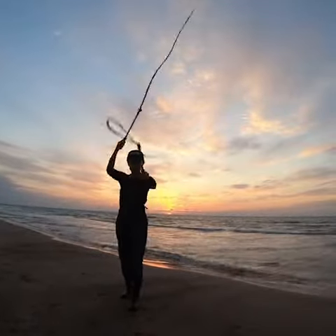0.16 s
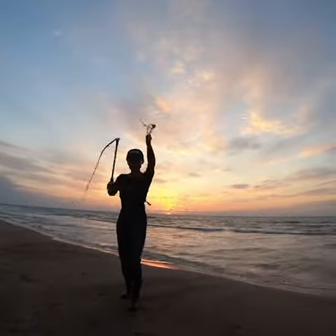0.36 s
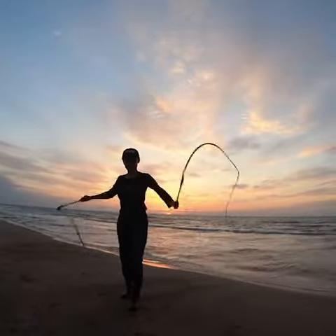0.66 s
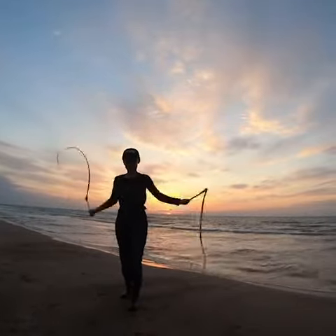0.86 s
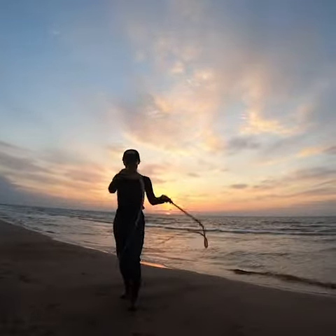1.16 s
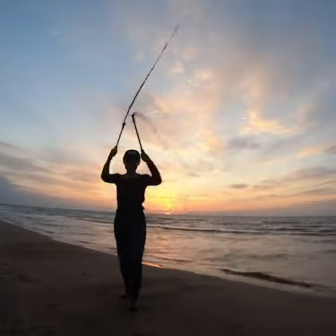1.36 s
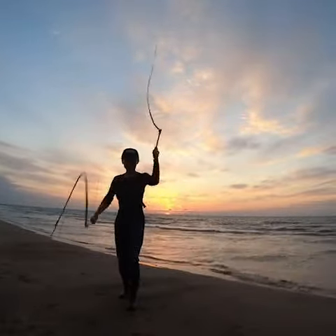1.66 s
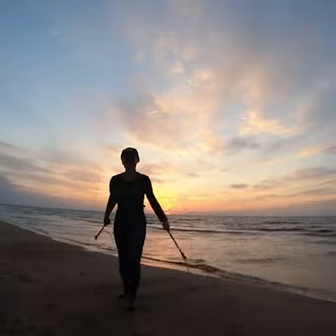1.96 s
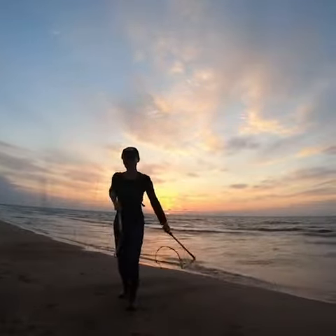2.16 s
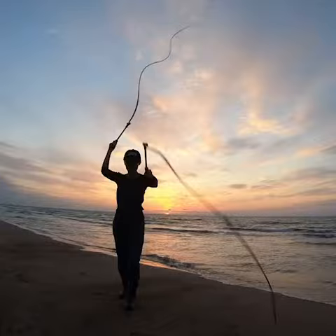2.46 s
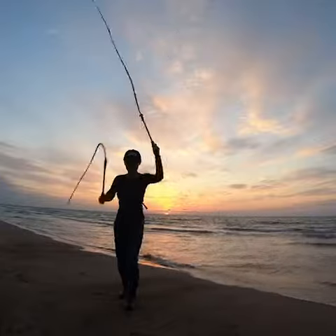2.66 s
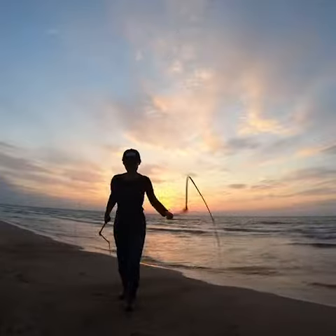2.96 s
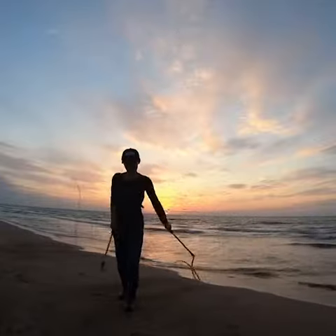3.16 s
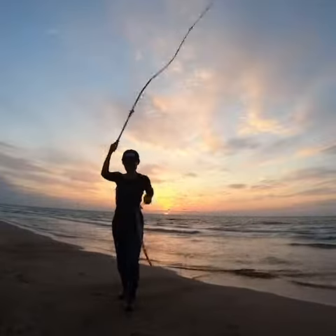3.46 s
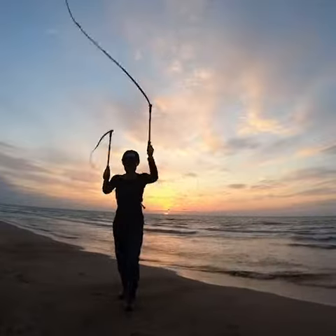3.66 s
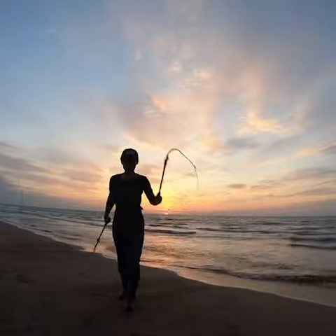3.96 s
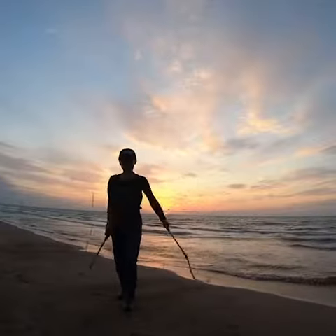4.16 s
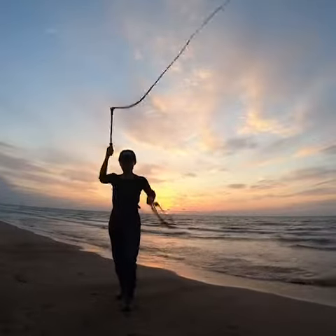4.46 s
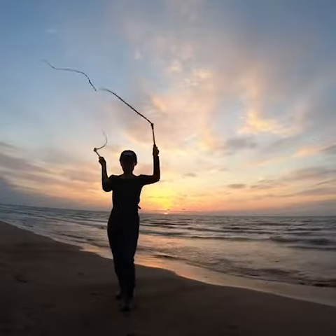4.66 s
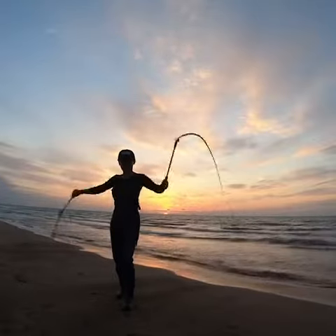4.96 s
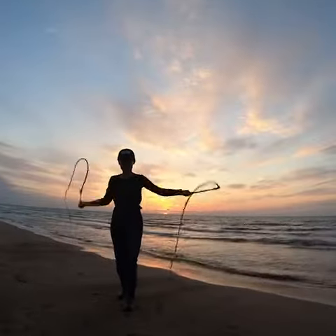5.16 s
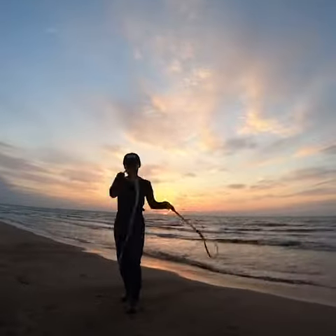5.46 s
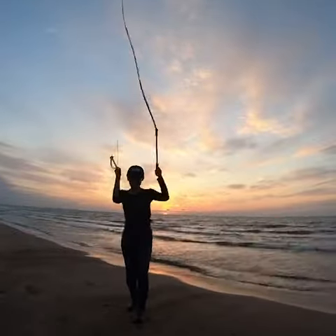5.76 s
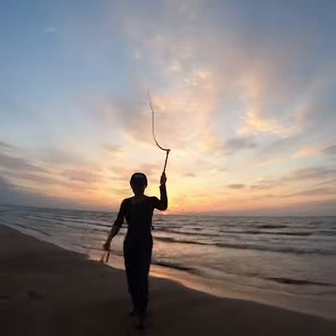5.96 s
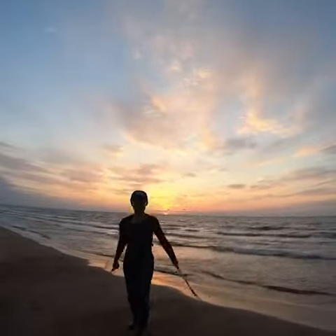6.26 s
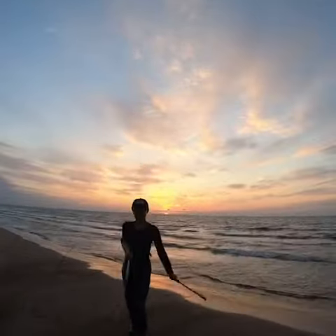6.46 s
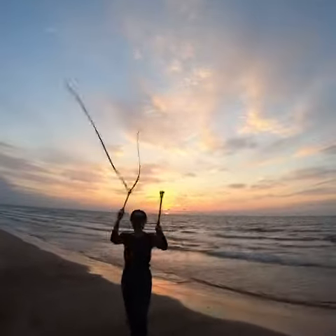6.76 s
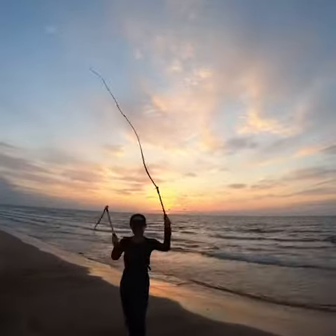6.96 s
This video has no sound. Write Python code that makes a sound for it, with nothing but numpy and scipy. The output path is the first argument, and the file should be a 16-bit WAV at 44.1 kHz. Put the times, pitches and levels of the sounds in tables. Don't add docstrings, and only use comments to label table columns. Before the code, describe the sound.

Two whips crack in sharp, dry, uneven snaps with ticks and swishes between, over soft surf hiss and low rumbling wind on an open beach.

```python
import sys
import numpy as np
from scipy import signal
from scipy.fft import rfft, irfft, next_fast_len
from scipy.io import wavfile
from scipy.ndimage import uniform_filter1d, map_coordinates

SR = 44100
rng = np.random.default_rng(int(sys.argv[2]) if len(sys.argv) > 2 else 0)


def decibels_to_gain(level_db):
    exponent = np.asarray(level_db, float) / 20
    return 10 ** exponent


def to_wav(sig):
    pcm = np.clip(np.atleast_2d(sig), -1, 1) * 32767
    pcm = np.round(pcm).astype(np.int16)
    wavfile.write(sys.argv[1], SR, pcm.T)


N = 313551
BLOCK_S = 512 / 48000


def unit(x):
    return x / np.sqrt(np.mean(x ** 2) + 1e-20)


def along(points, hz):
    f, v = np.transpose(points)
    return np.interp(np.log(hz + 1), np.log(f + 1), v)


def curves(rows):
    s, *cols = np.transpose(rows)
    return [np.interp(np.arange(N) / SR, s, c) for c in cols]


def filtered(x, response):
    n = x.shape[-1]
    m = next_fast_len(n + 4096)
    return irfft(rfft(x, m) * response(np.fft.rfftfreq(m, 1 / SR)), m)[..., :n]


def bell(hz, centre_hz, octaves):
    return np.exp(-.5 * (np.log2((hz + 1) / centre_hz) / octaves) ** 2)


def coloured_noise(size, response):
    return unit(filtered(rng.standard_normal((2, size)), response))


def wobble(rate):
    return map_coordinates(rng.standard_normal(int(N * rate / SR) + 4), [np.arange(N) * rate / SR])


def rush(spectrum, patchy_db, channels=1):
    z = signal.stft(rng.standard_normal((channels, N)), nperseg=512)[2]
    field = uniform_filter1d(rng.standard_normal(z.shape[1:]), size=5, axis=0)
    field = uniform_filter1d(field, size=12, axis=1)
    x = signal.istft(z * decibels_to_gain(patchy_db * unit(field)), nperseg=512)[1][:, :N]
    return unit(filtered(x, lambda hz: decibels_to_gain(along(spectrum, hz))))


def add(track, s, x):
    start = round(s * SR) + SR - x.shape[-1] // 2
    track[..., start:start + x.shape[-1]] += x


# (time [s], strength [dB], sharpness, small eddies over large [dB])
GUSTS = [(0.0, -37.5, 4), (0.4, -38, 0), (0.87, -42.5, 0.5), (1.94, -32.5, -3), (2.37, -44.5, 3.5),
         (2.63, -38.5, 1), (2.85, -40.5, -5.5), (3.15, -32, 2), (3.46, -40, -6), (3.9, -36.5, 3.5),
         (4.69, -38.5, 2), (4.89, -32, -3), (5.13, -38.5, 1), (6.08, -36.5, -2), (6.22, -49.5, -2.5),
         (6.52, -43, -1), (6.97, -30, 2), (7.11, -37.5, 4.5)]
# (frequency [Hz], density [dB per Hz])
RUMBLE_SPECTRUM = [(4, -56), (12, -21), (22, 12), (45, 20.5), (65, 8), (90, -21), (150, -120)]
BUFFET_SPECTRUM = [(25, -120), (45, -32), (65, 13.5), (105, 9), (145, 3.5), (185, -39.5), (300, -120)]
HOLLOW_SPECTRUM = [(70, -120), (110, -27), (150, -3), (250, -7.5), (380, -12), (500, -12.5), (580, -38.5),
                   (800, -120)]


def wind():
    strength_db, sharp_db = curves(GUSTS)
    mean_db = strength_db.mean()
    rumble_db = strength_db - sharp_db + 1.4 * wobble(6.2)
    buffet_db = strength_db + sharp_db - 5.5 + 3.4 * wobble(6.8)
    hollow_db = mean_db - 12.5 + 0.24 * (strength_db + sharp_db - mean_db) + 1.4 * wobble(13)
    rumble = decibels_to_gain(rumble_db) * rush(RUMBLE_SPECTRUM, patchy_db=2.0)
    buffet = decibels_to_gain(buffet_db) * rush(BUFFET_SPECTRUM, patchy_db=2.0)
    hollow = decibels_to_gain(hollow_db) * rush(HOLLOW_SPECTRUM, patchy_db=3.0)
    return (rumble + buffet + hollow)[0]


# (time [s], wash [dB])
WASH_LEVEL = [
    (0, -40.5),
    (.36, -48.5),
    (1.2, -48),
    (2.5, -48.5),
    (3.5, -47.5),
    (4.4, -47.5),
    (5.7, -43.5),
    (6.4, -46),
    (6.6, -47.5),
    (7.11, -47.5),
]
# (time [s], length [s], roar [dB])
TUMBLING_WAVES = [
    (6.324, 0.22, 11.5),
    (6.79, 0.059, 9.5),
]
# (frequency [Hz], density [dB per Hz])
WASH_SPECTRUM = [(600, -120), (1000, -14.5), (1280, 4), (1700, 8), (2640, 3), (3600, 2.5), (4700, -1),
                 (8000, -1), (9300, -13), (11500, -15), (12500, -23), (14300, -19), (15500, -29),
                 (15900, -120)]
ROAR_SPECTRUM = [(350, -120), (520, -30.5), (620, -15), (780, -10), (980, -17.5), (1120, -42.5),
                 (1600, -120)]


def surf():
    wash_db, = curves(WASH_LEVEL)
    t = np.arange(N) / SR
    roar_db = -70 + 0.96 * (wash_db - wash_db.mean())
    for s, length, db in TUMBLING_WAVES:
        roar_db = roar_db + db * np.exp(-((t - s) / length) ** 2)
    wash = decibels_to_gain(wash_db - 8.0) * rush(WASH_SPECTRUM, patchy_db=.7, channels=2)
    return wash + decibels_to_gain(roar_db + 10) * rush(ROAR_SPECTRUM, patchy_db=2.5, channels=2)


# (time [s], level [dB], from [Hz], to [Hz],
# length [s])
AEOLIAN_WHISTLES = [(.729, -39, 2760, 1400, 0.044), (.730, -29.5, 3294, 3000, 0.011),
                    (1.161, -45, 2640, 2340, 0.011), (1.172, -41, 1670, 1270, 0.024),
                    (1.191, -41, 940, 845, 0.009), (2.21, -43, 2060, 1590, 0.012),
                    (2.218, -34, 2850, 2530, .006), (2.226, -42, 2254, 878, 0.022),
                    (3.273, -37, 2670, 1713, 0.021), (3.29, -43.5, 1000, 792, 0.035),
                    (3.523, -44.5, 1984, 1307, 0.033), (4.033, -47.5, 1285, 840, 0.022),
                    (4.315, -51, 2164, 1276, 0.033), (5.443, -50, 2770, 1730, 0.021),
                    (5.475, -38, 1530, 1280, .014), (6.499, -48, 2796, 1280, 0.057),
                    (6.719, -42, 2204, 1490, .02), (6.985, -42.5, 1180, 803, .02),
                    (4.429, -42, 289.3, 189, .23), (4.74, -42.5, 216, 170, .13)]


def whistles():
    track = np.zeros(N + 2 * SR)
    for s, db, from_hz, to_hz, length in AEOLIAN_WHISTLES:
        u = np.linspace(0, 1, round(max(length, .004) * SR))
        smooth = 45 if to_hz > 500 else 900
        noises = rng.standard_normal((2, 4096 + len(u)))
        grain, waver = (unit(uniform_filter1d(v, size=smooth))[:len(u)] for v in noises)
        hz = (to_hz + (from_hz - to_hz) * (1 - u) ** 3.1) * (1 + .08 * waver)
        shape = np.sin(np.pi * u ** 0.7) * decibels_to_gain(-2.5 + 5.5 * grain)
        add(track, s + length / 2, decibels_to_gain(db) * shape * np.sin(2 * np.pi * np.cumsum(hz) / SR))
    return track[SR:SR + N]


def drawn_out(spread_s, size):
    late = np.tanh(unit(uniform_filter1d(rng.standard_normal((2, size // 2 + 1)), size=110)))
    turns = np.cumsum(spread_s * late * SR / size + .5, axis=1)
    return irfft(np.exp(-2j * np.pi * turns))


# (frequency [Hz], level [dB])
SHOCK_SPECTRUM = [(300, -21), (900, -8.5), (1400, -12.5), (2700, -9), (4500, 1), (6700, 4.5), (9000, 0.5),
                  (13000, -22.5), (15500, -22), (16500, -84)]
# (time [s], peak [dB], spray [dB], spray T60 [s], swish [dB])
LASH_FLICKS = [(.003, -39, -2, 0.076, -6), (0.7273, -15, -16.5, 0.11, -37), (0.7328, -19, -27, 0.0091, -33),
               (0.736, -23.5, -12.5, 0.022, -29), (0.751, -36, -16.5, 0.013, -30),
               (0.78, -28, -21.5, 0.01, -13), (0.7922, -35, -12, .015, -30), (0.844, -36, -24, 0.028, -24),
               (0.907, -29, -7, 0.016, -10), (0.9109, -30.5, -9, 0.01, -3), (1.174, -59.5, 8, 0.25, 12),
               (2.2221, -25.5, -15, 0.12, -13), (2.266, -27, -12.5, 0.0082, -13),
               (2.458, -52.5, -4.5, 0.47, 1.5), (2.84, -33.5, -22, .01, -33), (3.277, -23, -17, 0.079, -14),
               (3.325, -45, -8, .02, -20), (3.532, -53.5, 2, 0.17, 7.5), (4.041, -72, -11, .04, 15),
               (4.318, -40, -2.5, 0.14, -0.5), (4.472, -37, -6, 0.016, -20),
               (4.9571, -28.5, -3.5, .012, -22), (4.979, -36, -13, .01, -28), (5.106, -32, -14, 0.033, -27),
               (5.232, -21.5, -7, 0.012, -6), (5.454, -36, -6, 0.11, -4), (5.494, -38, -8, .01, -21),
               (6.5007, -26.5, -19, 0.19, -18), (6.7222, -36.5, -3, 0.023, 1.5),
               (6.9902, -58, -22, 0.069, 10.5)]
BRUSHING_FLICKS = [
    2.221,
    3.277,
    6.501,
    6.722,
]


def flicks():
    track, t = np.zeros((2, N + 2 * SR)), (np.arange(8192) - 4096) / SR
    colour = lambda f: decibels_to_gain(along(SHOCK_SPECTRUM, f))
    for s, peak_db, spray_db, t60, swish_db in LASH_FLICKS:
        fall = lambda life: decibels_to_gain(-60 * np.where(t > 0, t / max(life, .005), -t / 0.011))
        clumps = unit(uniform_filter1d(rng.standard_normal(len(t)), size=30))
        grit = rng.standard_normal((2, len(t))) * decibels_to_gain(0.93 * clumps)

        if min(abs(s - at) for at in BRUSHING_FLICKS) < .003:
            tick = filtered(grit, lambda f: bell(f, 7260, octaves=0.16) + 1.1 * bell(f, 2500, octaves=0.32))
            tick = tick * np.exp(-(t / 0.00094) ** 2)
        else:
            tick_colour = lambda f: colour(f) * decibels_to_gain(4.6 * bell(f, 1850, octaves=1.0))
            tick = filtered(drawn_out(0.00022, size=len(t)), tick_colour)

        dull_spray = unit(filtered(grit, lambda f: bell(f, 2000, octaves=1.35)))
        bright_spray = unit(filtered(grit[::-1], colour))
        spray = fall(t60) * dull_spray + 0.21 * fall(0.39 * t60) * bright_spray

        pitch_hz = 2763 * 2 ** (-0.017 * max(swish_db, 0))
        sinking_hz = pitch_hz * (.45 + .4 * np.exp(-np.clip(t, 0, 1) / .02))
        flutter = coloured_noise(len(t), lambda f: 1 / (1 + (f / 480) ** 2))
        swish = fall(1.4 * t60) * flutter * np.sin(2 * np.pi * np.cumsum(sinking_hz) / SR)
        add(track, s, decibels_to_gain(peak_db) * (tick / np.abs(tick).max() + decibels_to_gain(spray_db) * spray + decibels_to_gain(swish_db) * swish))
    return track[:, SR:SR + N]


def duck_db(peak_db):
    return np.clip(1.64 * (peak_db + 6.5), 0, 16)


def block_swell(t):
    return np.cos(np.pi / 2 * np.clip(t / 0.037, -1, 1)) ** 2 * decibels_to_gain(-300 * np.abs(t))


def block_copies(t):
    copies = 0
    for k in (-3, -2, -1, 1):
        copy = decibels_to_gain(-5 * abs(k)) * np.exp(-((t - k * BLOCK_S) / 0.00052) ** 2)
        copies = copies + copy * (.5 if k > 0 else 1)
    return copies


def gain_cut(t, db):
    return decibels_to_gain(-db * np.clip(t / 0.0074, 0, 1))


# (crack time [s], frequency [Hz], level [dB])
CRACK_RINGING = [(.49, 1265, -44), (.49, 1828, -37.5), (.49, 2108, -36), (.49, 3704, -23.5),
                 (1.06, 1733, -48), (1.7, 1265, -45), (1.7, 1545, -43.5), (1.7, 3798, -25),
                 (1.98, 1925, -35.5), (1.98, 2202, -42), (1.98, 3704, -36), (1.98, 3798, -37.5),
                 (2.75, 2110, -35.5), (2.75, 3704, -27.5), (3.05, 1825, -44), (3.05, 2110, -40),
                 (3.05, 3513, -41), (3.05, 3612, -37.5), (3.8, 1265, -41.5), (3.8, 2293, -40),
                 (3.8, 3884, -31), (3.8, 3984, -26.5), (4.1, 2479, -40), (4.1, 3889, -40), (6.24, 2210, -46),
                 (4.89, 3704, -29), (5.38, 1920, -45), (5.38, 2204, -43), (5.38, 2299, -45),
                 (5.38, 2396, -49), (5.38, 2953, -46), (5.38, 3518, -40.5), (5.98, 2204, -46),
                 (5.98, 3523, -48), (5.98, 3701, -29), (7.11, 2016, -38.5), (7.11, 3607, -32.5),
                 (0.49, 7730, -30), (0.49, 7830, -29), (0.49, 8010, -34), (0.49, 9040, -35),
                  (0.49, 9140, -35), (1.06, 6710, -38), (1.06, 7070, -39), (1.06, 7170, -41),
                  (1.7, 6890, -28), (1.7, 9140, -32), (1.98, 6990, -32), (1.98, 8760, -32),
                  (1.98, 8860, -33), (1.98, 8950, -34), (1.98, 9420, -36), (2.75, 7170, -37),
                  (2.75, 7270, -34), (3.05, 7070, -31), (3.05, 7170, -30), (3.05, 7270, -32),
                  (3.8, 6610, -32), (3.8, 6710, -31), (3.8, 9320, -34), (4.1, 6720, -38), (4.1, 6800, -34),
                  (4.1, 6900, -36), (4.1, 6990, -37), (4.1, 7080, -35), (4.1, 7170, -37), (4.89, 6890, -36),
                  (4.89, 6990, -37), (4.89, 8760, -36), (4.89, 8860, -37), (4.89, 9050, -39),
                  (5.07, 6890, -52), (5.07, 8490, -54), (5.38, 7170, -31), (5.38, 7450, -32),
                  (5.38, 7550, -30), (5.38, 7630, -35), (5.38, 8020, -32), (5.38, 8110, -31),
                  (5.38, 8580, -33), (5.38, 8680, -33), (5.61, 8770, -45), (5.61, 8950, -45),
                  (5.98, 7640, -31), (5.98, 7740, -31), (5.98, 7920, -29), (5.98, 8120, -31),
                  (5.98, 8200, -28), (5.98, 9700, -32), (6.24, 9240, -41), (6.24, 9320, -39),
                  (7.11, 7910, -34), (7.11, 8020, -34), (7.11, 8200, -31), (7.11, 8300, -31),
                  (7.11, 9040, -36), (7.11, 9240, -34),
                 (.49, 6420, -39.5), (.49, 12200, -42.5), (.49, 15100, -58), (1.06, 7850, -34),
                 (1.06, 8310, -33.5), (1.06, 11500, -50), (1.7, 10140, -34), (1.7, 10180, -34.5),
                 (1.7, 9750, -37), (1.7, 11000, -49), (1.7, 14000, -53.5), (1.98, 9840, -37.5),
                 (1.98, 11400, -45.5), (1.98, 12300, -43), (2.75, 10070, -45), (2.75, 10440, -42),
                 (3.05, 9570, -41), (3.8, 11700, -45), (3.8, 12140, -49.5), (3.8, 14500, -48.5),
                 (4.1, 8000, -37), (4.1, 9600, -49), (4.89, 8100, -40), (4.89, 10500, -38),
                 (4.89, 11800, -47), (4.89, 13460, -61), (5.38, 11160, -53), (5.98, 10300, -31.5),
                 (5.98, 11230, -37.5), (5.98, 12520, -45), (5.98, 13900, -52), (6.24, 9730, -38),
                 (6.24, 7080, -53), (6.24, 1730, -43.5), (5.61, 7600, -40), (5.38, 12980, -53),
                 (1.7, 12530, -55)]


def ringing_bins(t, s, peak_db):
    ringing = np.zeros((2, len(t)))
    start = rng.random((2, 1))
    fade = block_swell(t) * gain_cut(t, 12 + 0.4 * duck_db(peak_db)) * decibels_to_gain(-200 * np.clip(t, 0, 1))
    for at, near_hz, db in CRACK_RINGING:
        if abs(at - s) >= .1:
            continue
        hz = (near_hz * BLOCK_S // 1 + .5) / BLOCK_S
        wander = np.cumsum(uniform_filter1d(rng.standard_normal(len(t)), size=150)) * 0.0075
        tone = np.sin(2 * np.pi * (hz * t + start) + wander - wander[len(t) // 2])
        beat = 1 + 0.31 * np.sin(2 * np.pi * (t / BLOCK_S + rng.random()))
        ringing += decibels_to_gain(db - 2.5 + 7.0) * fade * beat * tone
    return ringing


def tip_shock(t, peak_db, colour, nulls_hz):
    spread_s = 0.00048 * min(decibels_to_gain(0.39 * (peak_db - 5.0)), 1)
    shock = filtered(drawn_out(spread_s, size=len(t)), colour) * np.exp(-(t / .00075) ** 4)
    shock = filtered(shock, lambda f: decibels_to_gain(-16 * sum(bell(f, null_hz, octaves=0.029) for null_hz in nulls_hz)))
    return 2.33 * shock / np.linalg.norm(shock, axis=1, keepdims=True)


def smear(t, peak_db, colour, copies_db, tail_db):
    bins = decibels_to_gain(0.62 * rng.standard_normal(128))

    def leak(f):
        dip = decibels_to_gain(-12 * bell(f, 5400, octaves=.25) - 7 * (f > 10600))
        return colour(f) * dip * bins[(f * BLOCK_S / 2).astype(int) % len(bins)]

    swell = block_swell(t)
    haze = coloured_noise(len(t), leak) * swell * decibels_to_gain(-60 * np.clip(t, 0, 1) / 0.13)
    copies = decibels_to_gain(copies_db) * block_copies(t) * np.sqrt(swell) * coloured_noise(len(t), leak)
    sand = 7 * decibels_to_gain(-60 * np.abs(t) / 0.018) + decibels_to_gain(tail_db + 45.5 - 60 * np.abs(t) / 0.063)
    bank = 1.2 * np.exp(-((t - 0.01) / .0012) ** 2)
    scatter = (sand * (t > 0) + bank) * coloured_noise(len(t), colour)
    return (haze + copies + scatter) * gain_cut(t, duck_db(peak_db))


def air_push(t):
    thud = unit(filtered(rng.standard_normal(len(t)), lambda f: bell(f, 283, octaves=0.45)))
    thud = thud * block_swell(t) * gain_cut(t, 11.0)
    u = (t - .0030) / 0.0022
    push = np.exp(-u ** 2) - 0.5 * np.exp(-((u - 2.1) / 1.62) ** 2) - 0.22 * np.exp(-((u + 2.18) / 4.1) ** 2)
    return (push + 0.087 * thud) * [[1], [0]]


# (time [s], peak [dB], low push [dB], body [dB], edge [dB])
WHIP_CRACKS = [(0.487, 7, -16.5, -1.5, -20), (1.0592, -6, -43, -0.5, 10.5), (1.7, 4, -11, 4.5, -6.5),
               (1.9781, 0, -10.5, 3.5, 9.5), (2.7503, 4.5, -12.5, 5.5, -16), (3.053, -0.5, -12.5, -7.5, 1),
               (3.7993, 6.5, -16, -3, -21.5), (4.1046, -2, -10, -1, 1.5), (4.892, 3, -13, 4, -3),
               (5.0674, -6.5, -9.5, 11.5, 7.5), (5.375, -1.5, -11, -6.5, -6), (5.6083, -15, -6, 13.5, 13.5),
               (5.9806, 4, -13.5, 4.5, -7.5), (6.2385, -4.5, -13, 5.5, 16.5), (7.1066, 3, -10.5, -1, -9.5)]
# (null [Hz], null [Hz], top end [dB])
SAND_NULLS = [(7200, 7900, 6.5), (8000, 11500, 2), (9000, 14000, -2.5), (9600, 10600, 0.5),
              (7050, 11000, -1), (8900, 8000, 2.5), (7250, 23000, 2.5), (11800, 14600, -11),
              (9000, 10300, 7.5), (12000, 14000, -1), (7800, 7400, 1.5), (5830, 10600, -13),
              (10500, 11500, -7), (10000, 11500, -10.5), (7500, 13000, -1.5)]
# (frequency 900 Hz above their lower edge [Hz], level [dB])
TREBLE_COPIES = [(8500, -25), (8100, -32.5), (9600, -25), (9050, -37.5), (10300, -41), (9400, -60),
                 (9600, -44.5), (7880, -43.5), (8700, -22.5), (8700, -54), (7940, -24.5), (7600, -46),
                 (7900, -24.5), (9500, -64), (8750, -33)]
# (under the body [dB], notch above it [dB], block copies [dB], sand tail [dB])
CRACK_TINTS = [(-15, -20, 1.5, -49.5), (-18, 4.5, 0, -40), (-3.5, -15, -4.5, -28), (-10, -0.5, 16, -54.5),
               (-15.5, -9.5, -1.5, -48), (-2, 2.5, 6, -54.5), (-19, -23, 4, -48.5), (-19, 2, 4, -77),
               (-1, -18, 12, -39), (12.5, 0.5, -7, -52), (-14, 4.5, 6.5, -49.5), (-6, -4, 2, -44),
               (-10.5, -13, -7, -62), (1, 4, 1, -66), (-2, -5.5, -8, -60.5)]


def cracks():
    track, t = np.zeros((2, N + 2 * SR)), (np.arange(4096) - 2048) / SR
    swell = block_swell(t)
    treble_shape = block_copies(t) * np.sqrt(swell) + .2 * swell
    for crack, nulls, treble_copy, tint in zip(WHIP_CRACKS, SAND_NULLS, TREBLE_COPIES, CRACK_TINTS):
        s, peak_db, push_db, body_db, edge_db = crack
        *nulls_hz, top_db = nulls
        cluster_hz, cluster_db = treble_copy
        under_db, notch_db, copies_db, tail_db = tint

        def colour(f):
            db = along(SHOCK_SPECTRUM, f)
            db = db + (body_db + 14) * bell(f, 2058, octaves=0.75) + edge_db * bell(f, 16200, octaves=0.72)
            db = db + (7 + top_db) * bell(f, 12800, octaves=0.12)
            return decibels_to_gain(db + under_db * bell(f, 1233, octaves=0.17) + notch_db * bell(f, 2750, octaves=0.17))

        shock = tip_shock(t, peak_db, colour, nulls_hz)
        haze = smear(t, peak_db, colour, copies_db, tail_db)
        add(track, s, decibels_to_gain(peak_db) * (shock + decibels_to_gain(-38.5) * haze + decibels_to_gain(push_db) * air_push(t)))
        treble = coloured_noise(len(t), lambda f: colour(f) * (f > cluster_hz - 900))
        treble = treble * treble_shape * gain_cut(t, duck_db(peak_db))
        add(track, s, decibels_to_gain(cluster_db) * 2.5 * treble)
        add(track, s, ringing_bins(t, s, peak_db))
    return track[:, SR:SR + N]


def ducking():
    t = np.arange(0, N, 32) / SR
    depth_db = 0
    for s, peak_db, *_ in WHIP_CRACKS:
        since = np.clip(t - s, 0, 9)
        recovery = np.exp(-(since / 0.12) ** 2.0) + 0.21 * np.exp(-since / 0.69)
        depth_db = depth_db + duck_db(peak_db) * np.clip((t - s) / .018, 0, 1) * recovery
    return decibels_to_gain(-np.interp(np.arange(N) / SR, t, depth_db))


# (from [s], centre [Hz], width [Hz], level [dB])
HELD_BANDS = [(0, 12100, 3000, 6), (0, 10620, 250, -12.5), (0.499, 6680, 298, 8), (1.08, 11300, 250, -14.5),
              (1.08, 10400, 500, 6), (1.716, 8880, 600, 18.5), (1.999, 10440, 596, -7.5),
              (1.999, 11500, 398, -11.5), (2.77, 11100, 1485, -17), (2.769, 9800, 352, 14.5),
              (3.07, 9900, 497, 1.5), (3.07, 11500, 900, -12), (3.82, 6740, 300, 8.5),
              (3.82, 10400, 1880, 4), (4.12, 10340, 1880, 4), (4.91, 8570, 704, 18),
              (4.91, 11000, 2100, 16), (5.08, 8840, 700, 16), (5.08, 10900, 2100, 5.5),
              (5.4, 8700, 252, 17.5), (5.4, 10500, 2200, -7), (5.62, 8900, 250, 12.5),
              (5.62, 10750, 2200, -10.5), (6.005, 9470, 1000, 14), (6.25, 9900, 700, -6)]
# (centre [Hz], width [Hz], level [dB])
HOUSING_BANDS = [
    (3550, 390, 2.5),
    (9900, 170, 4),
]
# (from [s], length [s], centre [Hz], level [dB])
WIND_HOOTS = [(0.506, 0.1, 181, 14), (0.715, 0.37, 376, 12.5), (1.25, 0.066, 209, 10.5),
              (1.807, 0.3, 374, 15), (2.034, 0.25, 255, 10), (2.771, 0.17, 176, 17),
              (3.047, 0.11, 186, 14.5), (3.098, 0.12, 109, 13), (3.629, 0.12, 204, 12.5),
              (3.815, 0.092, 191, 18.5), (4.442, 0.23, 249, 6), (4.639, 0.203, 189, 15.5),
              (4.894, 0.052, 190, 19), (5.26, 0.34, 218, 10.5), (5.46, 0.23, 299, 15),
              (6.022, 0.21, 387, 19.5), (6.28, 0.13, 470, 19.5)]
# (from [s], length [s], level [dB])
LOW_BOOMS = [
    (1.676, 0.076, 21.5),
    (1.967, 0.056, 20.5),
    (2.712, 0.092, 25),
    (3.032, 0.039, 17),
    (4.888, 0.119, 22),
    (5.982, 0.052, 19),
    (4.449, 0.03, 7.5),
    (5.48, 0.13, 10.5),
]


def noise_filter(x):
    bin_hz = 83.6
    hz, t, z = signal.stft(x, SR, nperseg=2048, noverlap=1536)
    resets = np.array([row[0] for row in WHIP_CRACKS])
    bands = [(s, resets[resets > s].min(), centre, width, db) for s, centre, width, db in HELD_BANDS]
    bands += [(-1, 9, centre, width, db) for centre, width, db in HOUSING_BANDS]
    bands += [(s, s + length, centre, bin_hz, db) for s, length, centre, db in WIND_HOOTS]
    bands += [(s, s + length, 111.8, bin_hz, db) for s, length, db in LOW_BOOMS]
    edge = lambda v, soft: np.clip(v / soft + .5, 0, 1)
    start, end, centre, width, db = np.transpose(bands)[:, :, None]
    in_band = edge(width / 2 - np.abs(hz - centre), 19)
    in_time = edge(np.minimum(t - start, end - t), 0.011)
    lift_db = (db * in_band).T @ in_time
    return signal.istft(z * decibels_to_gain(lift_db), SR, nperseg=2048, noverlap=1536)[1][:, :N]


# (frequency [Hz], level [dB])
WHIP_WIDTH = [(120, -95), (300, -47), (1000, -30), (4000, -18.5), (11000, -19), (13000, -5)]
SURF_WIDTH = [(11500, -59.5), (11900, 7), (15000, -9)]


def scene():
    gain = ducking()
    sea, lash, shocks = surf(), flicks(), cracks()
    low = filtered(wind(), lambda hz: np.array([hz < 340, hz >= 340]))
    deep, rest = noise_filter(np.array([low[0], sea[0] + low[1] + lash[0] + whistles()]))
    mid = deep + gain * rest + shocks[0]
    whips = filtered(gain * lash[1] + shocks[1], lambda hz: decibels_to_gain(along(WHIP_WIDTH, hz)))
    side = whips + gain * filtered(sea[1], lambda hz: decibels_to_gain(along(SURF_WIDTH, hz)))
    return np.array([mid + side, mid - side])


def top_cut(x):
    return signal.sosfilt(signal.butter(12, 15730, fs=SR, output="sos"), x)


# (frequency [Hz], level [dB])
BAND_LIMIT = [(14500, 0.5), (15650, -10), (15900, -58)]


def record(dry):
    full_scale = .85
    x = filtered(dry, lambda hz: decibels_to_gain(-2 * bell(hz, 1200, octaves=0.08)))
    x = x / (1 + np.abs(x / full_scale) ** 8) ** (1 / 8)
    mix = filtered(x, lambda hz: decibels_to_gain(along(BAND_LIMIT, hz)))
    return top_cut(mix)


dry = scene()
out = record(dry)
to_wav(out)
```